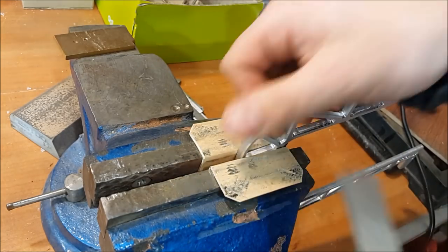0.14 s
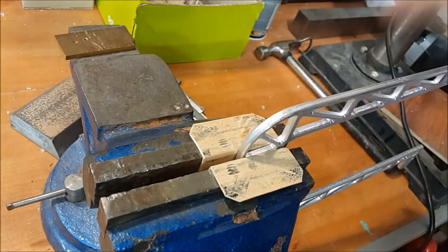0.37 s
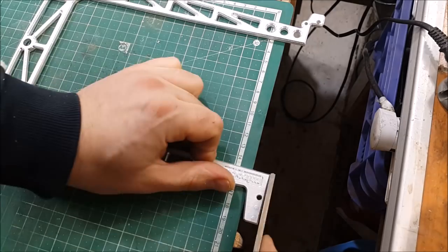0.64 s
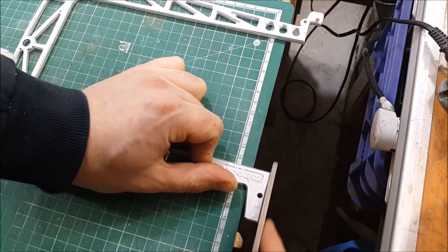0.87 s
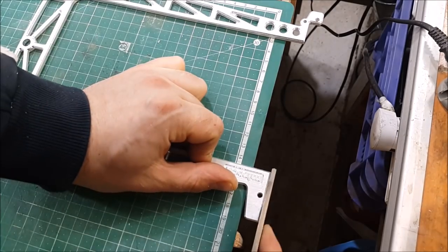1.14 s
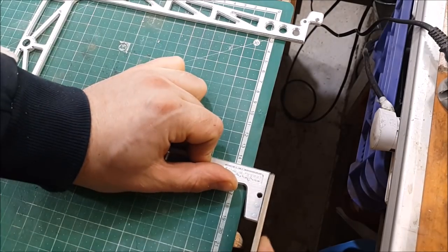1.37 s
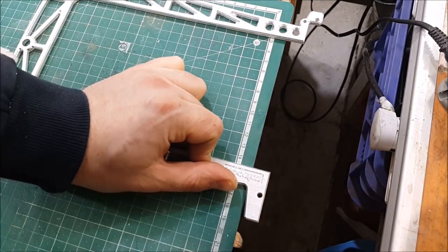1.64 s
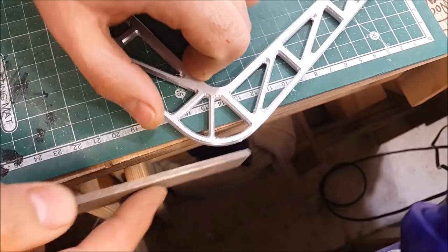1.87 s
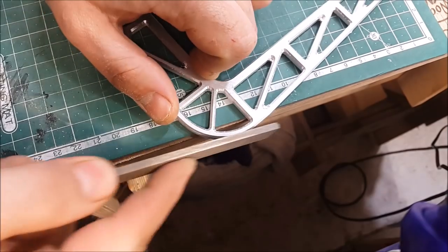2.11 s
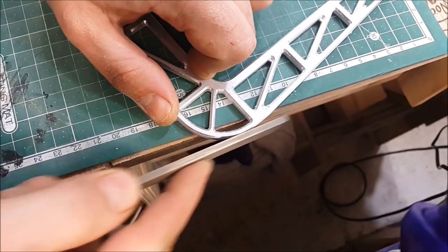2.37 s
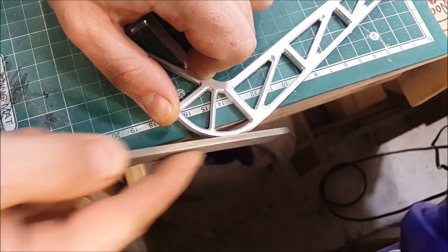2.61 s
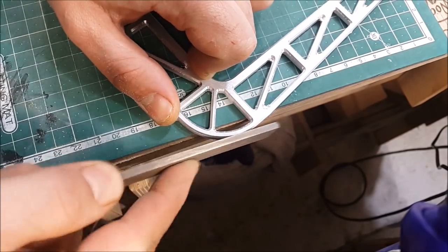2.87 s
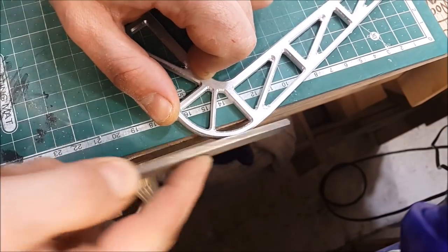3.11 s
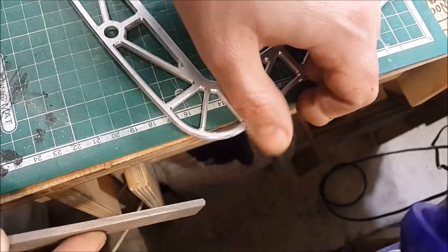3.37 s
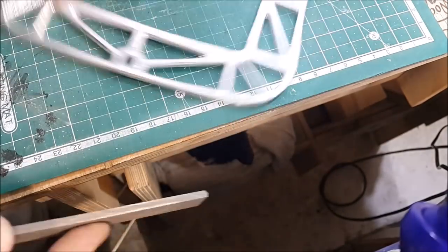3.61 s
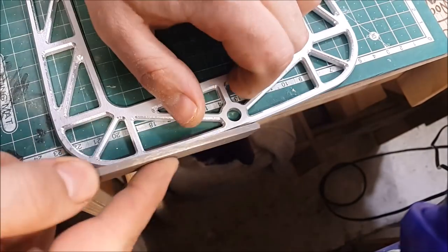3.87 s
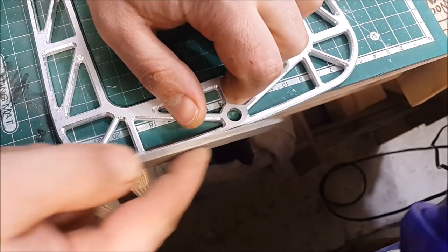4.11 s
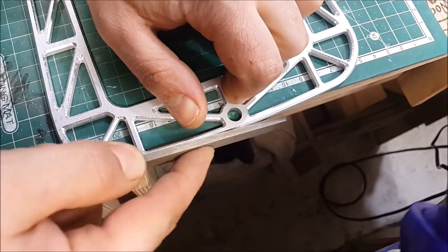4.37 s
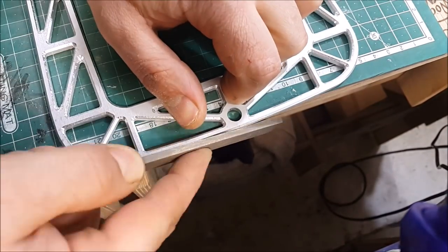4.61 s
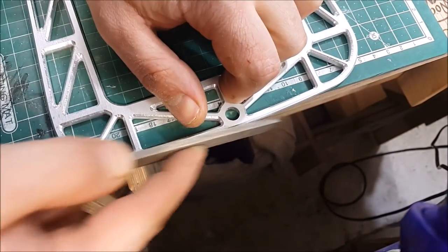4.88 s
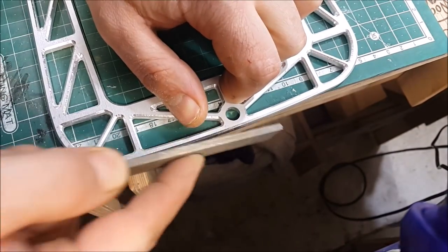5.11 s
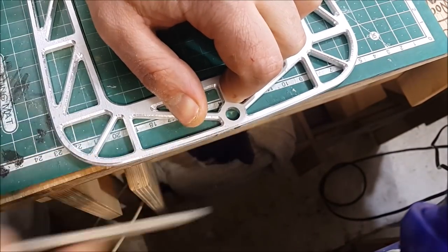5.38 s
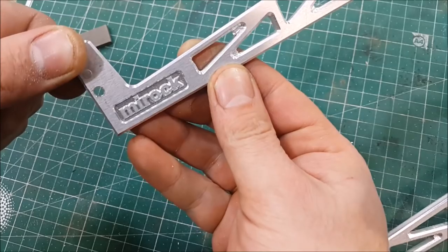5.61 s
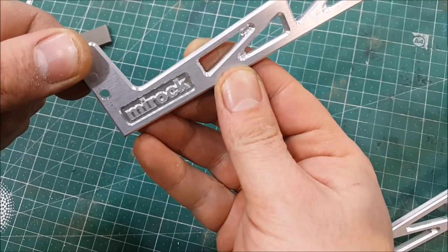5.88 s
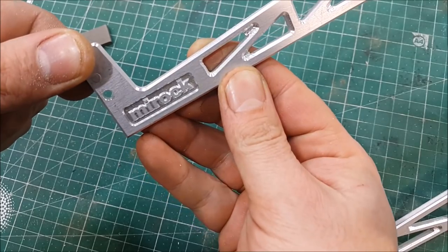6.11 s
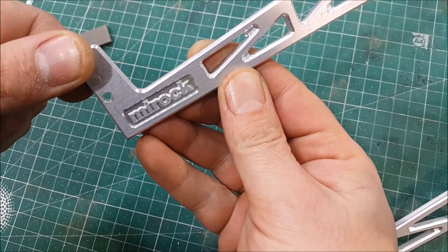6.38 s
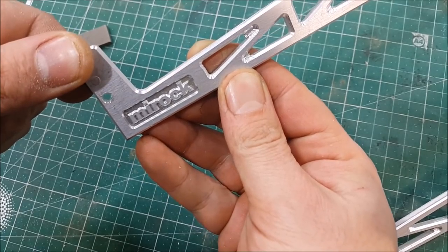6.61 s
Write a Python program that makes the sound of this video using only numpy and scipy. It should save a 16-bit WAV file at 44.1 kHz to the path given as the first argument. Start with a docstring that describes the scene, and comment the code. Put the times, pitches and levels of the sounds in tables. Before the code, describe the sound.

Close, dry stereo sound of metal filing at about four times natural speed. A clanking stroke at the vice cuts abruptly to a bright, squeaky sawing burst, then a lighter, hollow rasp, another rapid burst and several separated scrapes. Hands and metal rustle and tick in the gaps. The last second is nearly quiet, with flickering treble hiss and a tiny buzz at the very end.

```python
"""In a workshop, a hand file works on an aluminium frame, heard sped up to four times its natural speed: one
stroke at the vice, then bursts on the frame's foot, curved rim and long side on a bench. Teeth tear grains off
the metal, noise that excites the resonances of file and frame; on hard pushes they lock to a mode and squeal.
Hands, tool and frame rustle and tick between bursts, as rubbing noise and decaying impacts. The set-ups follow
one another abruptly."""
import sys
import numpy as np
from scipy import signal
from scipy.fft import rfft, irfft
from scipy.io import wavfile

SR = 44100
rng = np.random.default_rng(int(sys.argv[2]) if len(sys.argv) > 2 else 0)


def boost(x):
    """Linear amplitude factor 10**(x/20) for a level x in decibels (scalar or array-like)."""
    u = np.asarray(x, float) / 20
    return 10 ** u


def dump(signal):
    """Clip the signal to [-1, 1] and save it as 16-bit WAV at the path in sys.argv[1]."""
    limited = np.clip(np.atleast_2d(signal).T, -1, 1)
    pcm = np.round(limited * 32767).astype(np.int16)
    wavfile.write(sys.argv[1], SR, pcm)


N = 297234
T, HZ = np.arange(N) / SR, np.fft.rfftfreq(N, 1 / SR)
LIFT_MS = 60  # a longer gap between strokes counts as a lift of the file

# room tone spectrum: hz, gain_db
ROOM_SPECTRUM = [(18, -44.5), (30, -17), (193, -6.5), (231, -8), (344, -8.5), (376, -9), (547, -12.5),
                 (6000, -30), (7800, -69), (13200, -120)]
# course of the room tone: time_s, relative level_db
ROOM_COURSE = [(0, -65.5), (.55, -66.5), (.62, -84.5), (5.6, -81.5), (5.64, -74), (6.72, -74.5)]
# brief drops of the last set-up's treble: start_s, length_s, change_db
TREBLE_DROPS = [(5.958, 0.0155, -8), (6.261, .014, -15), (6.452, 0.0894, -11)]
# a thin scraping whistle: time_s, pitch_hz, relative level_db
WHISTLE_PATH = [(.13, 4230, -79), (.2, 4400, -67), (.3, 4170, -66), (0.358, 4100, -81), (.39, 3900, -60),
                (.48, 3990, -46.5), (.495, 3710, -88)]
# soft low bumps: start_s, level_db, pitch_hz, t60_s
LOW_BUMPS = [(0.045, -37.5, 194, 0.17), (.047, -38.5, 289, 0.15), (0.484, -49.5, 277, 0.056),
             (6.113, -62, 120, 0.084), (6.125, -62, 202, 0.18)]
# hands, sleeves and metal sliding on the mat:
# start_s, hold_s, dull level_db, bright scratch level_db re dull, fall_db_per_s
RUBS = [(0.098, 0.032, -57.5, -3.5, 300), (0.168, 0.13, -65, -0.5, 604), (0.337, 0.13, -68.5, 13, 204),
        (.69, 0.011, -50, -6, 700), (0.748, 0.078, -56, -4, 600), (1.692, .05, -66.5, 0, 74),
        (1.968, 0.044, -58, 2.5, 300), (2.059, 0.062, -60.5, -5, 600), (3.045, 0.029, -68.5, -4, 102),
        (3.284, 0.0066, -58, 0, 600), (3.339, .02, -63, -3, 300), (3.375, 0.066, -59, -2, 400),
        (3.558, .06, -68.5, -7, 301), (3.636, .02, -57.5, -5, 600), (3.671, 0.11, -42.5, 1, 1497),
        (3.869, .03, -64.5, 0, 299), (3.915, 0.017, -54, -3, 150), (4.636, 0.045, -61.5, -4, 602),
        (5.448, 0.091, -65, 0.5, 299.5)]
# taps of file and frame: start_s, relative crack_db, low part_db re crack
TAP_EVENTS = [(0.334, -42.5, -24), (0.34, -31, -20), (0.372, -26.5, -23.5), (0.663, -35, -5),
              (0.681, -29.5, -7), (0.736, -22.5, -28), (1.841, -37, -22), (2.193, -33, -14),
              (3.281, -34, -18), (3.373, -37, -3), (3.839, -54.5, 9.5), (4.6497, -27, -34), (5.615, -54, 1)]
# the file lands and scuffs:
# start_s, relative crack_db, low part_db re crack, scuff drive_db, rise_ms of the next push
LANDING_EVENTS = [(.042, -13.5, -15, -26, 64), (2.1434, -35, -25, -47.5, 27.1),
                  (3.106, -19, -36, -52, 23.7), (3.195, -24.5, -41, -48.5, 8.7),
                  (5.131, -22.5, -33, -56.5, 28), (5.246, -21.5, -36, -50, 26.5),
                  (5.376, -23.5, -26, -54.5, 21)]
# the file clinks on the vice: start_s, level_db, extra_db for modes above 4 kHz
CLINK_EVENTS = [(-.015, -50.5, -16), (.09, -41.5, -14), (.416, -48, -14), (.481, -42.5, 4)]
# modes of the vice: pitch_hz, level_db re the clink, t60_s
VICE_MODES = [(568, -2.5, 0.066), (1320, -5.5, 0.12), (3100, -5, 0.17), (4260, -27.5, 0.15),
              (4807, -33, 0.15), (7360, 3, 0.041), (8200, -19, 0.28), (10140, -38.5, 0.5)]
# filed spots, re the scrape of a usual push: start_s, bench and frame body_db, its slope_db_per_s,
# fine hiss_db, extra body_db on pulls, extra hiss_db on pulls
FILED_SPOTS = [(0, -5.5, 0.0, -15, 0.0, 0.0), (.6, -9.5, 0.65, -5, 4, 2), (1.9, -2.5, -8, -17, 1, 3),
               (3.08, -13.5, 3, -7.5, 0.0, 0.0), (3.6, 2.5, -15.5, -10, 1.5, 4),
               (4.62, -10.5, 6, -7, 4.5, 4.5), (5.08, -10, -6.5, -4, 0.0, 0.0)]
# strokes, pushes and pulls in turn: top_speed_s, scrape drive_db
STROKE_TIMES = [(0.084, -31.5), (.803, -43.5), (0.843, -46), (.883, -37.5), (0.91, -33), (.955, -32.5),
                (.981, -33), (1.018, -34.5), (1.054, -30.5), (1.098, -32.5), (1.122, -32.5), (1.164, -34.5),
                (1.193, -30.5), (1.232, -40.5), (1.264, -31.5), (1.304, -35.5), (1.333, -36.5),
                (1.366, -37.5), (1.401, -33.5), (1.436, -32.5), (1.466, -36.5), (1.503, -29.5),
                (1.537, -30.5), (1.575, -31.5), (1.608, -33.5), (1.652, -24.5), (1.676, -45.5),
                (2.174, -43.5), (2.213, -44), (2.247, -32.5), (2.281, -43), (2.316, -36), (2.35, -35.5),
                (2.384, -36), (2.414, -37), (2.447, -40.5), (2.475, -43.5), (2.506, -42.5), (2.537, -43),
                (2.569, -39), (2.595, -37.5), (2.628, -35.5), (2.66, -37), (2.688, -36), (2.713, -36.5),
                (2.75, -39), (2.777, -40), (2.811, -41), (2.839, -39.5), (2.871, -40.5), (2.906, -37),
                (2.941, -39.5), (2.968, -42.5), (3.007, -36), (3.034, -40), (3.139, -36.5), (3.219, -28),
                (4.004, -38), (4.043, -35.5), (4.085, -33.5), (4.114, -37.5), (4.145, -31.5),
                (4.178, -34.5), (4.212, -34.5), (4.238, -30.5), (4.276, -33), (4.308, -36.5),
                (4.341, -43.5), (4.372, -38), (4.406, -39), (4.434, -38.5), (4.47, -37), (4.501, -37.5),
                (4.544, -32), (4.696, -42), (4.729, -36.5), (4.769, -41), (4.795, -41.5), (4.831, -43.5),
                (4.862, -40.5), (4.896, -39.5), (4.922, -40.5), (4.957, -35.5), (4.984, -41), (5.032, -35),
                (5.181, -34.5), (5.308, -32), (5.427, -30)]
# set-ups: start_s, end_s, left-right lean_db, share of the side sound that is unrelated (0-1)
STEREO_SETUPS = [(0, 0.576, -2.5, 0.23), (.58, 1.886, -3, 0.7), (1.903, 3.5, 1.6, 0.4),
                 (3.505, 6.792, 2, 0.23)]
# modes of file and frame: pitch_hz, width_hz, gain_db at the vice, on the foot, on the rim, on the side
FRAME_MODES = [(590, 62, 3.5, -26, -42, -54), (838, 40.4, -27.5, 0.5, 0.5, -0.5),
               (1180, 81, 9, -13, -2, -3.5), (1487, 66, -20, 5.5, -1, 2),
               (1725, 75, -11, -2.5, -20.5, -8.5), (2614, 76, 8.5, -2.5, -20.5, -10),
               (3349, 109, -6.5, -1.5, 4.5, 5), (3946, 200, 6, 5, -1.5, 6.5),
               (4400, 110, -28.5, -11, -5.5, -6), (5360, 200, -18.5, 5, -1.5, 4),
               (6270, 540, -19.5, -4.5, -26.5, -14), (7880, 400, -21.5, -2, -3.5, -6),
               (10350, 2100, -10, -23, -44, -23.5), (12500, 3500, -23.5, -20, -27, -31)]
# scrape between the modes: hz, gain_db
SCRAPE_SPECTRUM = [(60, -51.5), (150, -29), (300, -21), (1000, -6.5), (2100, -13), (4000, -7),
                   (7500, -14.5), (11000, -18), (15500, -19)]
# hum of the teeth at their passing rate: time_s, pitch_hz at top speed, relative level_db re the body drive
TOOTH_HUM = [(2.14, 860, 1.5), (2.191, 875.4, 11.5), (2.205, 1180, -4), (2.42, 1273, 3), (2.499, 1217, -35),
             (3.979, 1080, -6.5), (4.0, 1090, -3.5), (4.078, 1673, 11), (4.18, 1355, -6.5),
             (4.211, 1550, -1), (4.32, 1340, -13)]
# teeth locking to a mode of the file: start_s, hold_ms, peak_db, pitch_hz, relative level_db of the slide down
SQUEAL_EVENTS = [(0.872, 4.5, -28, 8160, -37), (0.95, 3.1, -20.5, 8170, -34), (1.012, 3, -12, 7940, -27),
                 (1.08, 6.5, -14.5, 7900, -24.5), (1.149, 8.7, -14.5, 8060, -26),
                 (1.2182, 8.2, -17, 7990, -25), (1.298, 3.2, -21, 7750, -36),
                 (1.3591, 8.3, -14.5, 7910, -27), (1.4309, 5.3, -11.5, 8020, -35.5),
                 (1.4932, 7.8, -16.5, 7750, -23), (1.57, 1.4, -9, 7900, -25), (1.637, 5.1, -16, 7910, -17)]
# side against mid at the two microphones: hz, gain_db
SIDE_SPECTRUM = [(60, -21.5), (290, -7.5), (640, -13), (1410, -9.5), (3100, -3), (6820, 0.5), (8100, -3),
                 (15000, 2)]


def curve(times, values, outside):
    """Linear interpolation at every sample, with a fixed value outside the curve."""
    return np.interp(T, times, values, outside, outside)


def on_hz(points):
    """Spectral envelope: gain at every FFT bin, interpolated over log frequency."""
    hz, db = np.transpose(points)
    return boost(np.interp(np.log(HZ + 1), np.log(hz), db))


def band(low_hz, high_hz):
    """Band-pass law: gain falls as the fourth power of frequency beyond both edges."""
    return 1 / np.sqrt((1 + (low_hz / (HZ + 1)) ** 8) * (1 + (HZ / high_hz) ** 8))


def through(x, response):
    """Linear filtering, with the response scaled so that unit white noise keeps rms 1."""
    return irfft(rfft(x) * response, N) / np.sqrt(np.mean(np.abs(response) ** 2))


def drift(rate_hz):
    """Low-passed chance: noise that wanders slowly about zero with spread 1."""
    r = np.exp(-2 * np.pi * rate_hz / SR)
    settle = 20000  # samples dropped while the filter settles
    slow = signal.lfilter([1], [1, -2 * r, r * r], rng.standard_normal(N + settle))[settle:]
    return slow / slow.std()


def grit(spread_db, patchy_db, patch_rate_hz):
    """Granular noise: dense grains of uneven size that come in clumps, rms 1."""
    size_db = spread_db * np.minimum(rng.exponential(1, N), 4.0)
    clump_db = patchy_db * drift(patch_rate_hz)
    x = rng.standard_normal(N) * boost(size_db + clump_db)
    return x / x.std()


def resonance(x, hz, width_hz):
    """Damped oscillator: a two-pole resonance with gain 1 on top."""
    r = np.exp(-np.pi * width_hz / SR)
    poles = [1, -2 * r * np.cos(2 * np.pi * hz / SR), r * r]
    return signal.lfilter([(1 - r * r) / 2, 0, (r * r - 1) / 2], poles, x + 1e-18)


def sine(hz):
    """Phase accumulation: a sine whose pitch follows a frequency in time."""
    return np.sin(np.cumsum(hz) * 2 * np.pi / SR)


def air():
    """Stationary noise: room tone partly shared by both ears, hiss, and a treble that flickers."""
    noise = rng.standard_normal((5, N))
    room_db = curve(*np.transpose(ROOM_COURSE), -81) - 1.5
    room = boost(room_db) * through(noise[0] + 1.4 * noise[1:3], on_hz(ROOM_SPECTRUM))
    hiss = boost(-76) * through(noise[3:], band(2100, 17000))
    flicker = boost(6.2 * np.tanh(1.8 * drift(200)) - 0.5)
    top = on_hz([(6000, -14), (7500, -3.5), (9500, -6.5), (12000, -3.0), (15500, -6.5)]) * band(6500, 15960)
    level_db = -69.5 + sum(db * (T > s) * (T < s + length) for s, length, db in TREBLE_DROPS)
    lean = boost(9 / 2 * np.array([[1], [-1]]))  # left is 9 dB above right
    treble = boost(level_db) * (T > 5.62) * flicker * lean * through(rng.standard_normal((2, N)), top)
    return room + hiss + treble


def workshop(x):
    """Diffuse reverberation: a short decaying tail, different in each ear, duller than the direct sound."""
    t60_s, tail_db = 0.058, -10.5
    t = T[:SR // 2]
    tail = rng.standard_normal((2, len(t))) * boost(-60 * t / t60_s) * (t > .002)
    tail /= np.sqrt(np.sum(tail ** 2, axis=1, keepdims=True))
    return boost(tail_db) * irfft(rfft(x) * rfft(tail, N) * band(290, 5000), N)


def whistle():
    """Frequency modulation: a thin tone wavers along its path in pitch and level."""
    s, path_hz, path_db = np.transpose(WHISTLE_PATH)
    level = boost(curve(s, path_db, -120) + 5.6 * drift(120))
    return level * sine(curve(s, path_hz, 3905.0) * (1 + 0.023 * drift(290)))


def mains_hum():
    """Steady oscillation: a low sine at the vice, its level drifting slowly."""
    return boost(-70 + 2.5 * drift(5.2)) * np.sin(2 * np.pi * 99 * T) * (T < .607)


def bumps():
    """Free decay: each soft bump is a low sine that dies exponentially."""
    out = np.zeros(N)
    for s, db, hz, t60 in LOW_BUMPS:
        out += (T >= s) * boost(db - 60 * np.abs(T - s) / t60) * np.sin(2 * np.pi * hz * (T - s))
    return out


def buzz():
    """Harmonic series: eight falling partials and a noisy rasp set in at the end."""
    start_s, pitch_hz = 6.7235, 135
    turns = 2 * np.pi * pitch_hz * (T - start_s)
    partials = sum(np.cos(k * turns) / k ** 1.77 for k in range(1, 9))
    rasp = boost(-15.0) * through(rng.standard_normal(N), band(1600, 3900))
    return (T >= start_s) * boost(-38) * (partials + rasp)


def swells(rows, rise_db_per_s):
    """Exponential envelopes in dB: each swell rises to 0 dB, holds and falls."""
    shapes = []
    for s, hold, *_, fall in rows:
        shapes.append(-rise_db_per_s * np.clip(s - T, 0, None) - fall * np.clip(T - s - hold, 0, None))
    return np.array(shapes)


def rustle():
    """Sliding friction: smooth rubbing, dull from skin and mat, brighter from metal, over a faint stir."""
    stir_until_s, stir_db, stir_bright_db = 5.6, -70.5, -5  # bright part re the stir
    grains = np.array([grit(1.2, 1.2, 60), grit(1.2, 1.2, 60)])
    _, _, dull_db, bright_db, _ = np.transpose(RUBS)[:, :, None]
    dull_db = swells(RUBS, 899) + dull_db
    stirring = T < stir_until_s
    # swells add in power
    dull = np.sqrt(boost(2 * dull_db).sum(axis=0) + stirring * boost(2 * stir_db))
    bright_power = boost(2 * (dull_db + bright_db)).sum(axis=0)
    bright = np.sqrt(bright_power + stirring * boost(2 * (stir_db + stir_bright_db)))
    hump = on_hz([(200, -13), (500, 5.0), (1100, 9.0), (2200, 0.5), (4000, -5.5), (8000, -10.0), (15500, -16.0)])
    rubbing = through(grains * dull, hump * band(250, 1900))
    return rubbing + through(grains * bright, hump * band(2710, 17000))


def taps():
    """Impact: a noise crack dies within milliseconds and its low part lasts longer."""
    crack, thud = np.zeros(N), np.zeros(N)
    for s, crack_db, low_db, *_ in TAP_EVENTS + LANDING_EVENTS:
        after = np.clip(T - s, 0, 1) * 1000 / 6.7  # in steps of 6.7 ms
        crack += (T >= s) * boost(crack_db - 5.5 - 60.0 * after ** 0.6)
        thud += (T >= s) * boost(crack_db + low_db - 1.5 - 11.8 * after)
    noise = rng.standard_normal((2, N))
    return through(noise[0] * crack, band(1800, 14000)) + through(noise[1] * thud, band(290, 1600))


def clinks():
    """Modal ringing: the file strikes the vice, whose modes decay as separate sines."""
    out = np.zeros(N)
    for s, db, treble_db in CLINK_EVENTS:
        for hz, mode_db, t60 in VICE_MODES:
            level_db = db + mode_db + treble_db * (hz > 4000) - 60 * (T - s) / t60
            out += (T >= s) * boost(level_db) * np.sin(2 * np.pi * hz * (T - s))
    return out


def mode_sign(k):
    """Modal phase: narrow modes alternate in sign, broad ones are positive."""
    return (-1) ** (k * (FRAME_MODES[k][1] < 2000))


def body(setup):
    """Modal superposition: the response of parallel modes over the broad scrape."""
    out = on_hz(SCRAPE_SPECTRUM).astype(complex)
    for k, (hz, width, *db) in enumerate(FRAME_MODES):
        out += mode_sign(k) * boost(db[setup]) / (1 + 2j * (HZ - hz) / width)
    return out * band(120, 15700)


def strokes():
    """Reciprocating motion: all strokes and scuffs in order as top s, rise ms, scrape, body and hiss dB."""
    usual_db, body_follows, hiss_follows = -36, 0.34, .6  # body and hiss change less than the scrape
    s, db = np.transpose(STROKE_TIMES)
    gap_ms = 1000 * np.diff(s, prepend=-1)
    fresh = gap_ms > LIFT_MS
    count = np.arange(len(s))
    # after a lift a push comes first
    pull = (count - np.maximum.accumulate(count * fresh)) % 2
    # a longer turn gives a slower rise
    quick_rise_ms = 10.45 + .7 * np.clip(gap_ms - 30.4, 0, None)
    rise = np.where(fresh, 17.1, quick_rise_ms)
    land_s, _, _, scuff_db, push_rise = np.transpose(LANDING_EVENTS)
    rise[np.searchsorted(s, land_s)] = push_rise
    s = np.append(s, land_s + .006)  # scuffs top 6 ms after landing
    db = np.append(db, scuff_db)
    rise = np.append(rise, 10.1 + 0 * land_s)
    pull = np.append(pull, 0 * land_s)
    columns = np.transpose(FILED_SPOTS)
    spot = np.searchsorted(columns[0], s) - 1
    start, body_db, body_slope, hiss_db, pull_body_db, pull_hiss_db = columns[:, spot]
    low = usual_db + body_follows * (db - usual_db) + body_db + body_slope * (s - start) + pull * pull_body_db
    hiss = usual_db + hiss_follows * (db - usual_db) + hiss_db + pull * pull_hiss_db
    return np.array([s, rise, db, low, hiss])[:, np.argsort(s)]


def speed(level_db, depth_db, shape):
    """Energy summation: strokes swell to top speed and die towards the next, adding in power."""
    power = np.zeros(N)
    s_top, rises = strokes()[:2]
    falls = np.clip(np.append(800 * np.diff(s_top) - rises[1:], 99), 7.0, 14.0)
    falls[1000 * np.append(np.diff(s_top), 1) > LIFT_MS] = 11.7  # ms, before a lift
    for s, rise, fall, db in zip(s_top, rises, falls, level_db):
        near = slice(max(int((s - .15) * SR), 0), int((s + .15) * SR))
        rising = T[near] < s
        away = np.where(rising, (s - T[near]) / rise, (T[near] - s) / fall) * 1000
        steepness = shape * np.where(rising, 1.39, 1)  # the rise is squarer than the fall
        part = boost(2 * (db - depth_db * away ** steepness))
        # a stroke that tops after a landing is silent before it
        for landing, *_ in LANDING_EVENTS:
            part = part * ((T[near] >= landing) | (s < landing))
        power[near] += part
    return np.sqrt(power)


def squeals():
    """Stick-slip locking: the tooth rate drops onto a mode, holds a clear tone, then slides down."""
    held, sliding = np.zeros(N), np.zeros(N)
    wobble, catch = drift(320), boost(2.0 * drift(750))
    for s, hold, peak_db, hz, slide_db in SQUEAL_EVENTS:
        near = slice(int((s - .004) * SR), int((s + .05) * SR))
        ms = (T[near] - s) * 1000
        rate = hz * (1 + .1 * np.exp(-np.clip(ms + 1, 0, None) / .9) + .015 * wobble[near])
        edge_db = 7.7 * np.clip(.6 - ms, 0, None) + 3.3 * np.clip(ms - hold + 1.1, 0, None)
        held[near] += boost(peak_db - edge_db) * catch[near] * sine(rate)
        # the slide as the push slows
        done = (ms - hold) / 15
        rate = hz * np.clip(1 - .6 * done, .35, 1) * (1 + 0.11 * wobble[near])
        swell = boost(slide_db - 16 * (done - .45) ** 2) * catch[near] ** 2
        sliding[near] += swell * sine(rate)
    return held + boost(-9.0) * through(sliding, body(1))  # the slide sounds through the frame's foot


def tooth_hum():
    """Periodic excitation: teeth hum at their passing rate, which sags where the file turns."""
    low_db = strokes()[3]
    s, path_hz, path_db = np.transpose(TOOTH_HUM)
    slowing = 1 - np.minimum(speed(0 * low_db, 9.0, 2.3), 1)
    hz = curve(s, path_hz, 998.5) * (1 - .18 * slowing + .04 * drift(250))
    level = speed(low_db + 2.6, 24.0, 2.2) * boost(curve(s, path_db, -120))
    return level * (.9 + .45 * np.array([drift(70), drift(70)])) * sine(hz)


def setup_now():
    """Piecewise-constant conditions: index of the set-up at every sample."""
    return np.searchsorted([end for _, end, *_ in STEREO_SETUPS], T)


def filing():
    """Forced vibration: grit under the stroke speed drives waxing and waning modes; two versions."""
    _, _, scrape_db, low_db, hiss_db = strokes()
    # the treble needs speed, the lows ring on through the turn
    speeds = [speed(low_db, 6.4, 1.63), speed(scrape_db, 16.2, 1.106), speed(hiss_db + 3.5, 15.0, 1.6)]
    edges_hz = [(30, 2540), (2200, 7840), (7000, 13100)]
    setup = setup_now()
    grains = np.array([grit(2.7, 1.78, 230), grit(3.0, 3.0, 310)])
    out = 0
    for swell, (low, high) in zip(speeds, edges_hz):
        # every set-up is equally loud in this band for the same swell
        responses = [body(k) * band(low, high) for k in range(len(STEREO_SETUPS))]
        power = np.array([np.mean(np.abs(response) ** 2) for response in responses])
        drive = grains * swell / np.sqrt(power[setup])
        broad = on_hz(SCRAPE_SPECTRUM) * band(low, high) * band(120, 15700)
        out = out + irfft(rfft(drive) * broad, N)
        for k, (hz, width, *db) in enumerate(FRAME_MODES):
            if low <= hz < high:
                gain = boost(np.array(db)[setup] + 3.0 * drift(45))  # the contact moves
                out += mode_sign(k) * resonance(drive * gain, hz, width)
    return out + tooth_hum()


def place(alike, unlike):
    """Interchannel difference: the sides get a quarter-turned copy and unrelated sound, per set-up."""
    turned, apart = irfft(rfft([alike, unlike]) * on_hz(SIDE_SPECTRUM) * [[1j], [1]], N)
    lean_db, share = np.transpose(STEREO_SETUPS)[2:, setup_now()]
    share = np.clip(share, 0, 1)
    side = np.sqrt(1 - share) * turned + np.sqrt(share) * apart
    # only the middle and treble lean to one side
    side += np.tanh(lean_db * np.log(10) / 40) * irfft(rfft(alike) * band(600, 11000), N)
    return alike + side * [[1], [-1]]


def scene():
    """Superposition: all sources, placed, with room; a cut to silence and a fade-in follow the vice."""
    scrape, unlike = filing()
    squeal = squeals()
    soft, soft_unlike = rustle()
    tones = whistle() + mains_hum() + bumps() + buzz()
    alike = scrape + squeal + soft + taps() + clinks() + tones
    sound = place(alike, unlike + soft_unlike) + workshop(alike) + air()
    sound += .15 * squeal * np.array([[-1], [1]])  # the squeal leans right
    sound += -.0005  # steady offset
    silent_from_s, silent_to_s, fade_in_s = 0.551, .607, 0.066
    fade = np.clip((T - silent_to_s) / fade_in_s, 0, 1) ** 1.1
    return sound * np.where(T < silent_from_s, 1, fade)


def roll_off(x):
    """The treble ends steeply here."""
    return signal.sosfilt(signal.butter(12, 16970, fs=SR, output="sos"), x)


def record(dry):
    """Band limitation: a steep low-pass removes the top of the spectrum from 17 kHz."""
    mix = signal.sosfilt(signal.cheby2(10, 60, 17000, fs=SR, output="sos"), dry)
    return roll_off(mix)


dry = scene()
out = record(dry)
dump(out)
```